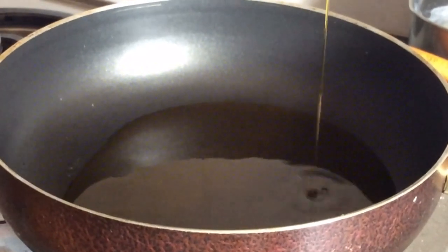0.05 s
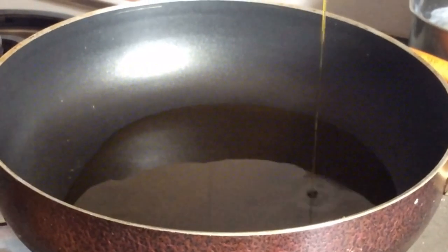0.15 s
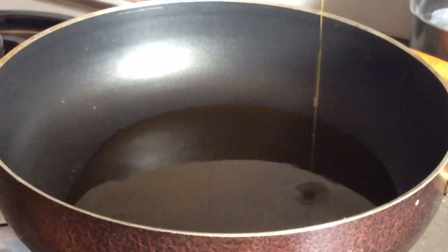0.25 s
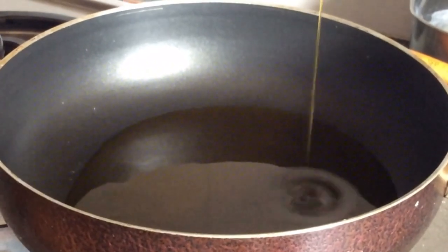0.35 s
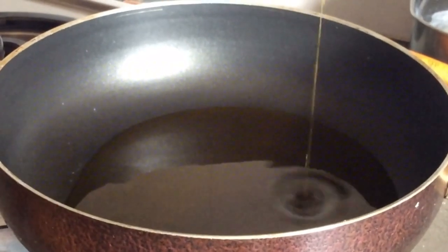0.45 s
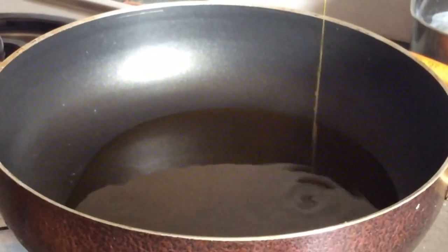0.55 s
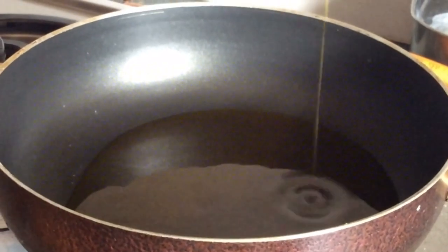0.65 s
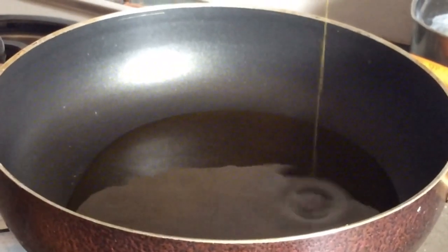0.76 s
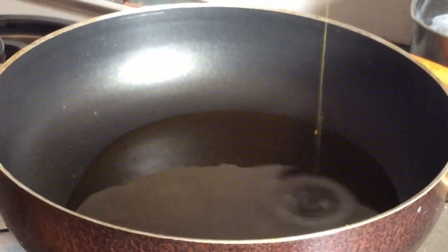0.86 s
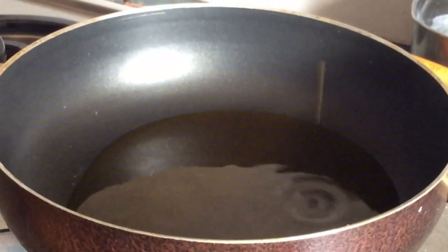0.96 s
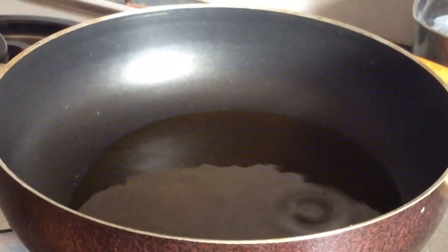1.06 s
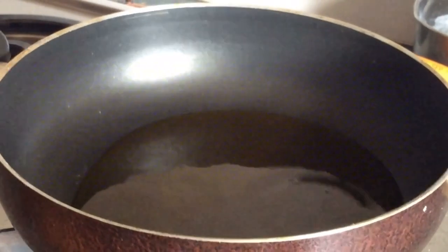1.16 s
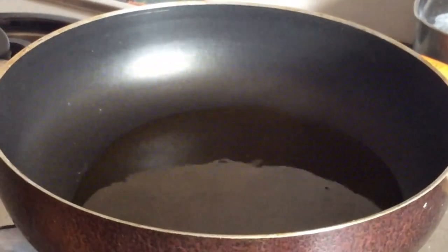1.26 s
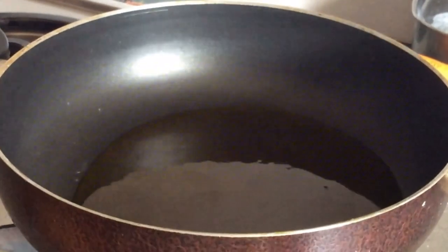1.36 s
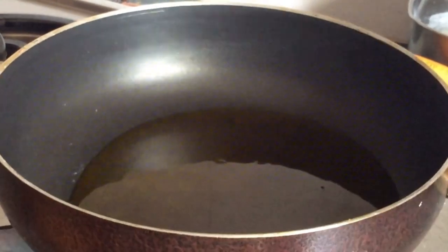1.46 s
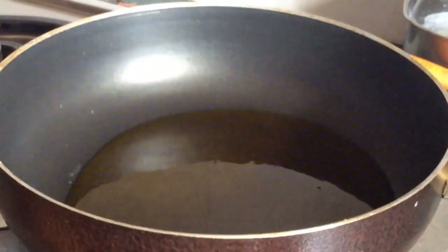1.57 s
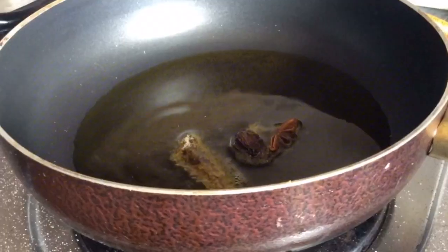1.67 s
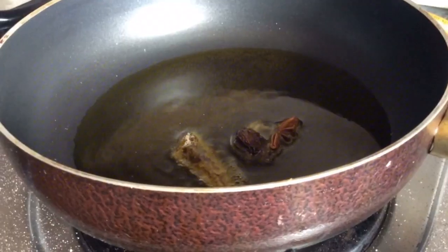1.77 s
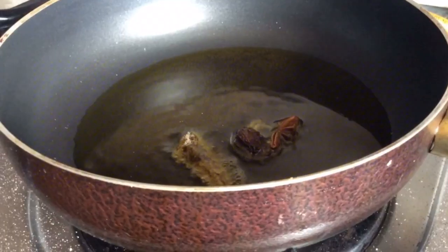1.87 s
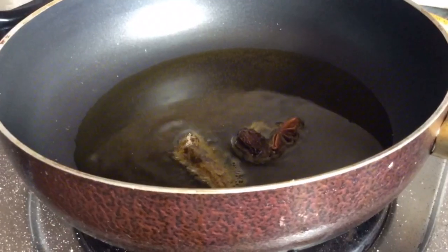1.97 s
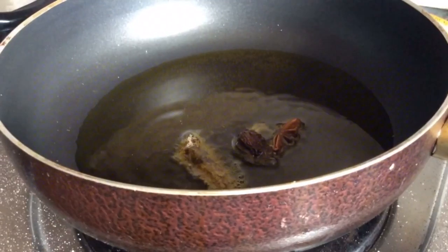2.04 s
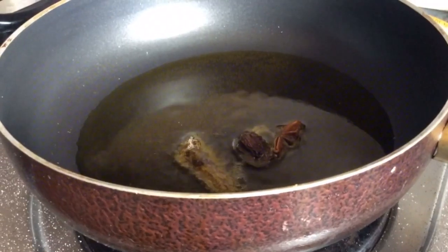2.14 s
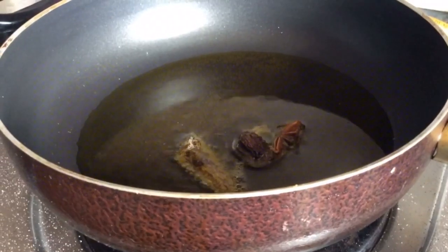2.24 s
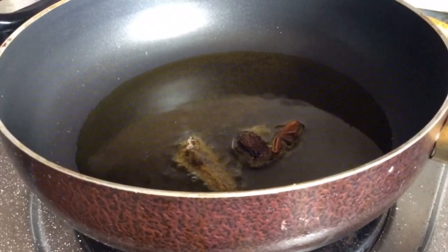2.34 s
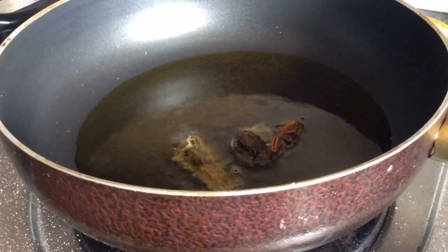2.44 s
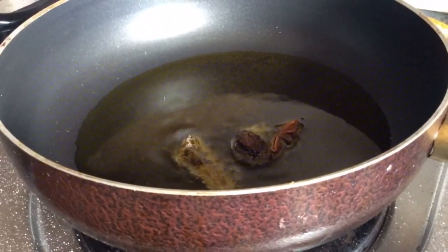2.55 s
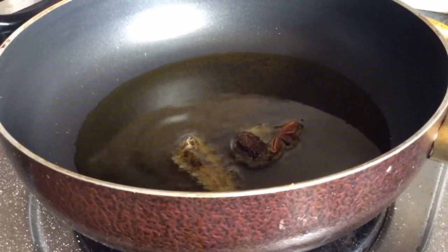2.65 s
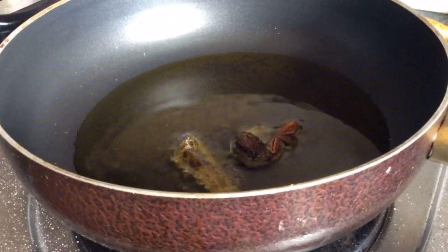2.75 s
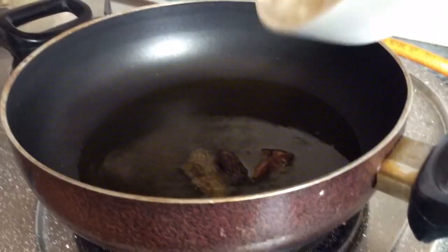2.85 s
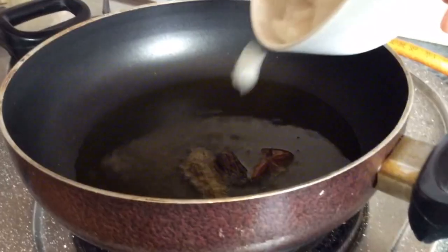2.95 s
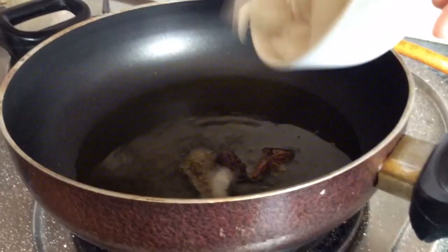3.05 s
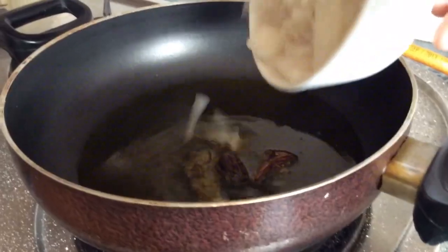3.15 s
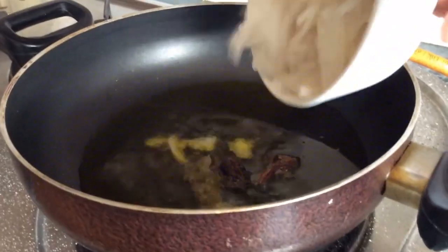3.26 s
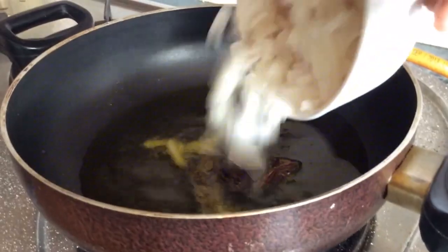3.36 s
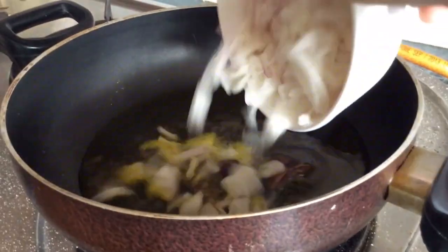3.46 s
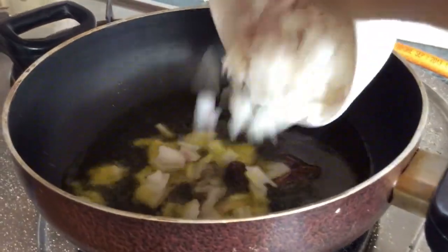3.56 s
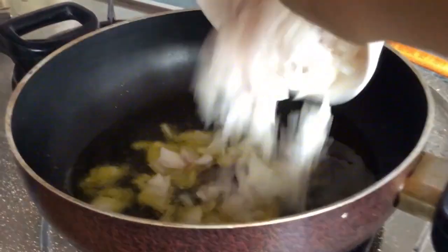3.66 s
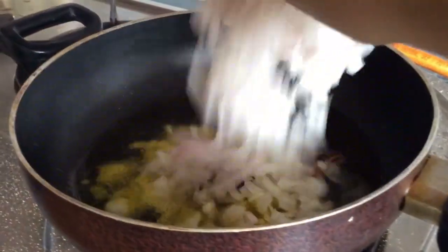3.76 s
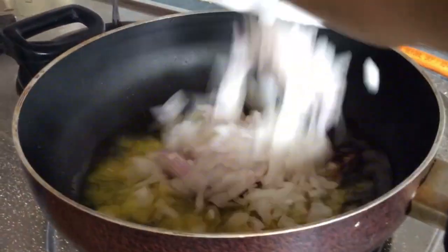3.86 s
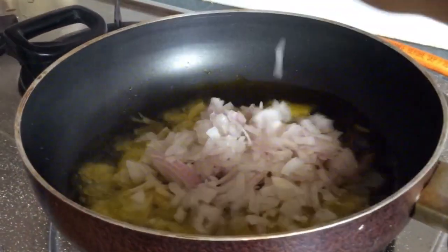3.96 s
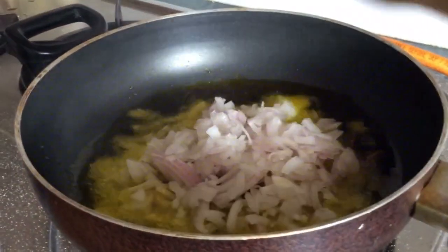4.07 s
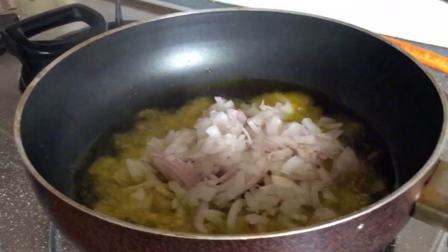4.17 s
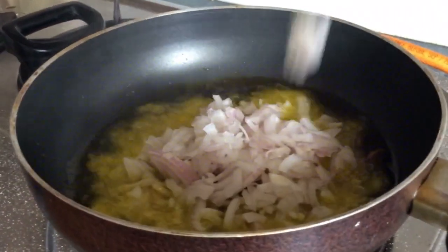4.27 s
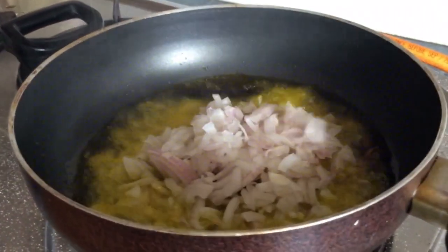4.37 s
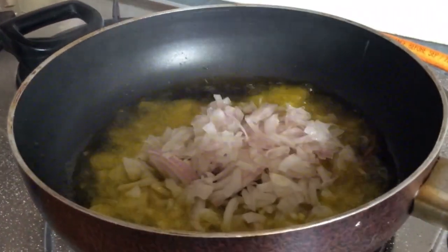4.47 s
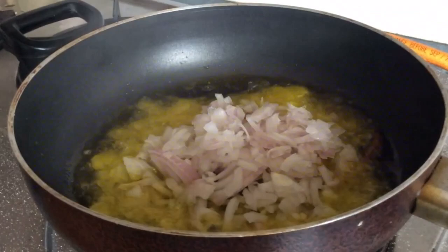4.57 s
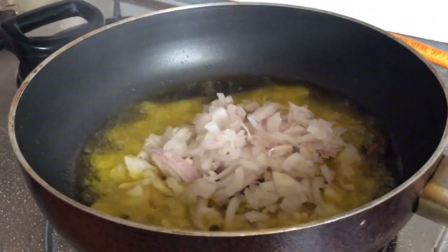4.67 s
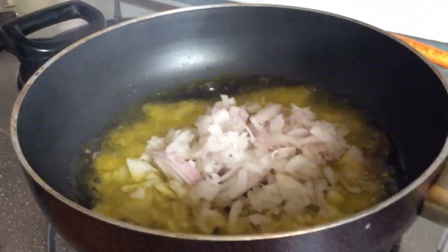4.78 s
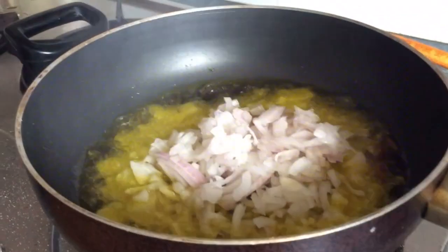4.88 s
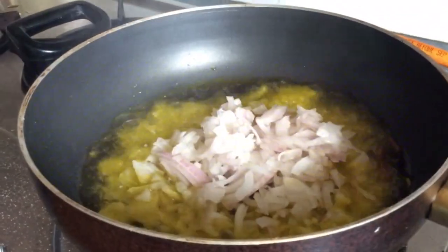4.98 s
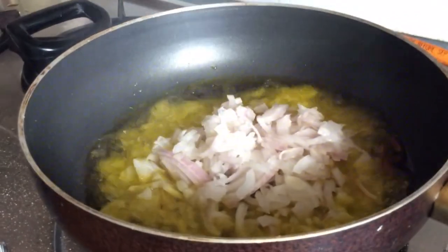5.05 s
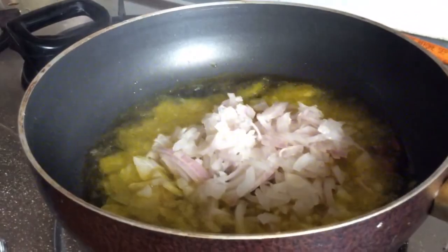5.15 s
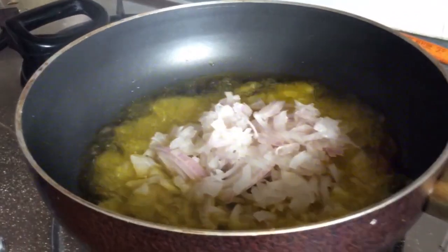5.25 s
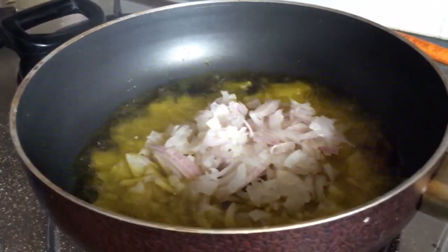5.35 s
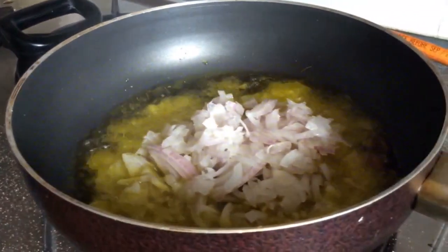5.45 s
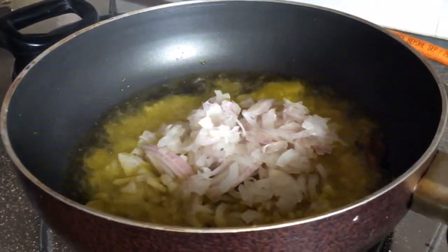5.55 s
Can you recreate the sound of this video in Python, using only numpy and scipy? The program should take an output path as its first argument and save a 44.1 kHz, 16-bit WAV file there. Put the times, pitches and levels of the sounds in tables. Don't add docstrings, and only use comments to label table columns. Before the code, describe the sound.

Close microphone over a pan in a small, slightly reverberant kitchen. Over three seconds of near quiet hold low rumble, faint drips, isolated knocks, distant crow calls and a barely audible fine fizz. Chopped onions then land in bursts, flashing into dense bright sizzle and hard crackles, loudest around four seconds, before easing to steady frying with larger popping bubbles.

```python
import sys
import numpy as np
from scipy import signal
from scipy.fft import rfft, irfft
from scipy.io import wavfile
from scipy.ndimage import uniform_filter1d

SR = 44100
rng = np.random.default_rng(int(sys.argv[2]) if len(sys.argv) > 2 else 0)


def digitize_waveform(pressure):
    field = np.atleast_2d(pressure).T
    bounded = np.clip(field, -1, 1)
    quanta = np.round(bounded * 32767).astype(np.int16)
    wavfile.write(sys.argv[1], SR, quanta)


def voltage_ratio(decibels):
    exponent = np.asarray(decibels, float) / 20
    return 10 ** exponent


N = 247522
TIME = np.arange(N) / SR
BINS = np.fft.rfftfreq(N, 1 / SR)


# (time [s], level [dB])
STEAM = [
    (3.258, -55),
    (3.284, -42.5),
    (3.43, -43.5),
    (3.6, -33),
    (3.75, -30),
    (4.104, -24),
    (4.322, -26.5),
    (4.996, -32.5),
    (5.61, -34),
]
# (time [s], extra level [dB], spread [s])
LANDINGS = [
    (3.29, -1.5, 0.024),
    (3.39, 3, 0.018),
    (3.475, 3, 0.015),
    (3.56, 3, 0.039),
    (3.69, 1, 0.056),
]


def steam():
    surges = sum(db * np.exp(-((TIME - s) / spread) ** 2) for s, db, spread in LANDINGS)
    return np.interp(TIME, *np.transpose(STEAM)) + surges


# (frequency [Hz], density [dB/Hz])
FRY_COLOUR = [(150, -60), (250, -38), (399, -24.5), (554, -19), (693, -16.5), (824, -11), (980, -13.5),
              (1340, -9), (1890, -8), (2900, -5.5), (3310, -1), (3800, -3), (7040, 1), (8220, 5.5),
              (9440, 3.5), (12500, -7.5), (15600, -20)]


def frying():
    heap_s, heap_spread_s = 3.83, 0.23
    spray_open_db, spray_covered_db = 3, -2.56
    big_db, big_db_per_s, steam_mid_db = -38.5, 2.5, -28
    mid_db = steam()
    covered = .5 + .5 * np.tanh((TIME - heap_s) / heap_spread_s)
    high_db = mid_db + spray_open_db + (spray_covered_db - spray_open_db) * covered
    low_db = big_db + (mid_db - steam_mid_db) + big_db_per_s * (TIME - STEAM[5][0])
    dense = evened(bubbling(per_s=7000, spread_db=3.0, clump_db=1.1, wet_db=-8))
    crackle = evened(bubbling(per_s=420, spread_db=2.0, clump_db=1.5, wet_db=-12))
    fizz = patchy(coloured(dense + voltage_ratio(-7.0) * crackle, FRY_COLOUR))
    low, below = lowpassed(fizz, 2370), lowpassed(fizz, 6470)
    big = voltage_ratio(low_db) * evened(low)
    middling = voltage_ratio(mid_db) * evened(below - low)
    fine = voltage_ratio(high_db) * evened(fizz - below)
    return (TIME >= STEAM[0][0]) * (big + middling + fine)


# (time [s], peak [dB], pitch [Hz])
TICKS = [(3.3219, -25.0, 9040.0), (3.3271, -20, 8350.0), (3.374, -29, 6760), (3.3918, -24.0, 9220.0),
         (3.3978, -22.0, 7670.0), (3.5777, -11, 8100.0), (3.5945, -19, 8530.0), (3.6155, -21, 8440.0),
         (3.6836, -8.5, 4390.0), (3.7056, -8, 7600), (3.7193, -15, 8600), (3.7295, -17, 9820.0),
         (3.7737, -12, 8000), (3.8033, -22, 4000), (3.8094, -13.0, 5860.0), (3.8786, -11.0, 7670.0),
         (3.8917, -11.5, 4220.0), (3.9044, -8, 9100), (3.9286, -19, 8200), (3.9483, -10.0, 6630.0),
         (4.0364, -16, 7840.0), (4.0681, -3, 9130.0), (4.0836, -7.0, 5600.0), (4.0984, -8, 5340.0),
         (4.1574, -6, 8530.0), (4.1803, -21, 5500),
         (4.2576, -15, 3880.0), (4.267, -13, 3620.0), (4.3019, -18, 6890.0), (4.3319, -18, 7400),
              (4.3471, -15, 4130.0), (4.3553, -14, 8240), (4.4296, -20, 9300.0), (4.445, -15, 9000),
              (4.4716, -14, 10420.0), (4.5038, -16, 8300), (4.5092, -4, 3600), (4.5533, -20, 8010.0),
              (4.601, -12, 6460.0), (4.644, -18, 9400), (4.6494, -16, 4570.0), (4.682, -15.0, 9220.0),
              (4.7191, -14.0, 7840.0), (4.7648, -13, 5170.0), (4.7894, -16, 7320.0), (4.8398, -14.5, 2400),
              (4.8992, -17, 2370), (4.9369, -17.5, 2740), (5.019, -19, 3190.0), (5.051, -15, 7840.0),
              (5.1122, -11, 5770.0), (5.18, -12, 5100), (5.2247, -16, 3530.0), (5.3106, -12.0, 8270.0),
              (5.3313, -16, 5860.0), (5.361, -16, 8440.0), (5.3712, -15, 4310.0), (5.403, -18, 7670.0),
              (5.435, -18.0, 3700.0), (5.493, -14, 8100.0), (5.574, -17, 5400), (5.5802, -9, 8350.0)]
# (time [s], peak [dB], pitch [Hz])
SPRAY = [(3.2107, -29, 5860), (3.256, -31, 8270), (3.2768, -25, 8100), (3.2832, -28, 9000),
         (3.2908, -21, 9600), (3.3369, -15, 8150), (3.3562, -20, 7850), (3.4776, -13, 9000),
         (3.5491, -10, 7600), (3.5601, -13, 8150), (3.5778, -11, 7860), (3.5818, -15, 7660),
         (3.6733, -10, 9200), (3.7738, -15, 7900), (3.8736, -7.5, 7800), (3.9335, -6.5, 7400),
         (3.9937, -2, 8650), (4.0653, -6, 8950), (4.3319, -8, 8100), (4.4827, -12, 9150),
         (4.5039, -18, 8480), (3.705, -15, 7960), (3.44, -19, 5940), (5.3107, -18, 8200),
         (5.3611, -18, 8440)]
# (time [s], peak [dB], pitch [Hz])
SNAPS = [(3.3981, -29, 7600), (3.6471, -29, 5200), (3.8834, -10, 5360), (3.9287, -6, 8160),
         (3.9671, -6, 4260), (4.0736, -1.5, 4600), (4.1522, -2, 3650), (4.1803, -16, 5540),
         (4.1983, -9, 8970), (4.221, -5, 9200), (4.2798, -14, 4940), (4.3485, -28, 1000),
         (4.5229, -10, 4200), (4.6071, -7, 4000), (4.6942, -9, 6000), (4.8197, -4.5, 8250),
         (5.1871, -11, 3240), (5.2094, -9, 3030), (5.2482, -12.5, 5640), (5.4031, -29, 5990),
         (5.5803, -11.5, 1510)]
# (time [s], peak [dB], pitch [Hz], snap share [0-1])
CRACKS = [(3.4066, -10, 5770, .75), (3.4867, -8, 8000, .55), (3.6606, -2, 8200, .65),
          (3.6802, -3, 8180, .3), (4.3175, -4, 6500, .6), (4.4474, -1, 7600, .45), (4.5091, -2, 4300, .7),
          (4.6191, 0, 7800, .6), (4.8285, -7, 6500, .65), (5.3375, -7, 6650, .4), (5.5862, -1, 2950, .8)]
# (time [s], peak [dB], pitch [Hz], ring [cycles])
BUBBLES = [(3.4634, -14.5, 4670, 2.7), (3.746, -10, 4400, 3.8), (3.829, -16, 3640, 9.7),
           (4.0585, -10, 3920, 4.2), (4.0837, -16, 5400, 2.9), (4.3716, -11, 3500, 5),
           (4.7555, -8, 3850, 2.1), (4.7628, -12, 2300, 1.4), (4.829, -28, 990, 2.6),
           (4.8509, -5.5, 3500, 3.4), (4.8601, -11.5, 4060, 6.5), (4.876, -7.5, 2930, 4.7),
           (4.9367, -19.5, 2820, 4.3), (4.9926, -9, 3720, 5.8), (5.1237, -7.5, 3220, 4.9),
           (5.1821, -5.5, 2720, 2.8), (5.1988, -6, 3500, 1.3), (5.276, -16.5, 3800, 3.7),
           (5.2765, -21, 1300, 1.2), (5.345, -12, 4950, 3.2), (5.3714, -14.5, 3400, 4.9),
           (5.4612, -9.5, 3320, 15), (5.5087, -16, 3340, 1), (5.586, -19, 890, 0.49),
           (5.225, -22.5, 1420, 1.3), (5.256, -25.5, 1000, 1.4), (5.501, -28.5, 1100, 1.3)]


def spits():
    ticks = pops(TICKS, cycles=2.1, snap=0.28, sputter_ms=0.56, wet_db=-5)
    spray = pops(SPRAY, cycles=2.9, snap=0.04, sputter_ms=2.0, wet_db=-6.5)
    snaps = pops(SNAPS, cycles=1.8, snap=0.67, sputter_ms=1.1, wet_db=-5)
    cracks = sum(pops([(s, db, hz)], cycles=3.7, snap=snap, sputter_ms=0.99, wet_db=None)
                 for s, db, hz, snap in CRACKS)
    bubbles = pops(BUBBLES, snap=.25, sputter_ms=1.7, wet_db=-16)
    return ticks + spray + snaps + room(cracks, wet_db=-12.5) + bubbles


# (middle [s], spread [ms], level [dB], pitch [Hz])
FLURRIES = [(3.277, 1.2, -25.5, 8200), (3.284, 2.4, -35, 9200), (3.291, 1.7, -26, 9200),
            (3.298, 1.7, -32, 8500), (3.326, 4, -33, 8400), (3.338, 1.5, -28, 8050),
            (3.358, 1.8, -28, 8100), (3.374, 3.1, -36, 7000), (3.447, 5, -33, 5600),
            (3.454, 2.1, -33, 2600), (3.468, 3.6, -31, 5000), (3.157, 3, -53, 5500),
            (3.212, 2, -42.5, 8300), (3.407, 0.91, -22, 10000), (4.319, 1.5, -22, 4500),
            (3.479, 2, -29, 9000), (3.488, 2.3, -22, 7500), (3.546, 6.8, -27, 8250), (3.568, 3, -25, 4700),
            (3.58, 2.5, -21, 7600), (3.647, 3.5, -23, 5370), (3.65, 3.2, -23, 8900),
            (3.674, 1.2, -31, 9200), (3.685, 2, -25, 4530), (3.713, 2.3, -37, 3320),
            (3.775, 1.7, -26, 4100), (3.826, 3.6, -26, 7700), (3.884, 4.7, -26, 3430), (5.02, 3, -30, 3630),
            (5.266, 2, -26.5, 5200), (5.29, 3.5, -34, 3120), (5.406, 2.3, -32, 3100), (4.551, 2, -36, 3250),
            (4.585, 1.7, -26, 4300), (4.395, 2.4, -31, 3600)]


def flurries():
    pitch_width_share, rise_share = 0.21, 0.58
    out, t = np.zeros(N), np.arange(-1000, 1000) / SR
    hz_axis = np.fft.rfftfreq(2000, 1 / SR)
    for s, spread_ms, db, hz in FLURRIES:
        swarm = rng.standard_normal(2000) * rng.exponential(1, 2000) ** 1.7
        resonance = 1 / (1 + ((hz_axis - hz) / (pitch_width_share * hz)) ** 2)
        swarm = evened(irfft(rfft(swarm) * resonance))
        spread_s = np.where(t < -spread_ms / 2000, rise_share, 1) * max(spread_ms, .5) / 1000
        out[round(s * SR) - 1000:][:2000] += voltage_ratio(db) * swarm * np.exp(-(t / spread_s) ** 2 / 2)
    return room(out, wet_db=-8)


# (start [s], end [s], level [dB], rise [dB/s])
SIMMER = [
    (1.693, 2.887, -63, 0.5),
    (2.889, 3.27, -59.5, 5.5),
]
# (frequency [Hz], density [dB/Hz])
SIMMER_COLOUR = [(2120, -23), (3600, -1.5), (4090, -6.5), (4590, -1.5), (4960, -6), (6280, -1), (6880, -5),
                 (8200, 1), (9540, -1), (13600, -17), (15300, -16)]


def simmer():
    fizz = bubbling(per_s=9000, spread_db=3.5, clump_db=.8, wet_db=0.1)
    fizz = evened(coloured(fizz, SIMMER_COLOUR))
    return sum(between(s, end) * voltage_ratio(db + db_per_s * (TIME - s)) * fizz
               for s, end, db, db_per_s in SIMMER)


# (start [s], length [s], pitch [Hz], level [dB], change [dB/s])
HOLLOWS = [(0, .35, 2050, -67, -15), (0.33, 0.15, 5250, -52, -170), (1.25, .12, 3330, -63, -100),
           (1.25, .08, 4500, -69, -120), (1.25, .08, 7100, -70, -120), (1.685, 0.11, 365, -59, -80),
           (2.887, 0.46, 754, -70.5, 3), (3.143, 0.044, 560, -57, -150), (3.145, 0.036, 1194, -58, -100),
           (3.14, .16, 930, -63, -20), (3.205, .07, 2500, -62, -30), (3.492, 0.15, 553, -53, 0),
           (3.675, .025, 530, -47, 0), (3.75, .3, 560, -55, 3)]


def hollow_notes():
    out = np.zeros(N)
    for s, length, hz, db, db_per_s in HOLLOWS:
        level = voltage_ratio(db + db_per_s * np.clip(TIME - s, 0, length))
        out += between(s, s + length) * level * whistle(hz, width_hz=35 + 0.1 * hz)
    return out


# (time [s], peak [dB], decay [ms])
KNOCKS = [
    (0.3258, -27.5, 4),
    (1.2476, -37.5, 5.1),
    (1.988, -24, 1.9),
]
# (frequency [Hz], density [dB/Hz])
KNOCK_COLOURS = [
    [(880, -54), (1500, -41), (2080, -11), (3400, -20), (4770, -6), (5350, 1), (9450, -20), (10800, -39),
     (11300, -67), (15000, -41)],
    [(880, -62), (1500, -39), (2150, -10), (2600, -22), (3350, 4), (3850, -18), (4350, -2), (5100, -22),
     (5700, -13), (6400, -20), (7050, -7), (7600, -18), (8600, -11), (9740, -18), (11300, -37),
     (13000, -97)],
    [(880, -57), (1500, -28), (3000, -11), (3680, -6), (4560, -1), (5350, -22), (6690, -3), (7350, -9),
     (8300, 1), (14000, -36)],
]


def knocks():
    out, t = np.zeros(N), np.arange(2048) / SR
    hz_axis = np.fft.rfftfreq(2048, 1 / SR)
    for (s, db, decay_ms), colour in zip(KNOCKS, KNOCK_COLOURS):
        rattle = irfft(voltage_ratio(read(colour, hz_axis)) * np.exp(2j * np.pi * rng.random(1025)))
        rattle = rattle * np.exp(-t / (decay_ms / 1000)) * (1 - np.exp(-t / .0001))
        out[round(s * SR):][:2048] += voltage_ratio(db) * rattle / abs(rattle).max()
    return room(out, wet_db=-13)


# (time [s], peak [dB], pitch [Hz])
CLICKS = [(.012, -49, 8160), (.0214, -49, 9340), (.0493, -44, 7240), (.0935, -40.5, 2630),
          (.0495, -50, 2670), (.1535, -56, 3100), (1.033, -57, 5600), (1.4726, -52, 8400), (1.5, -56, 5000),
          (2.545, -51, 4000), (.1451, -47, 2940), (.1514, -58, 7470), (.2369, -52, 6950),
          (.2523, -52, 4100), (.2808, -45.5, 4090), (.2907, -52, 2100), (.2912, -46, 3130),
          (.3014, -49, 9400), (.4469, -53, 11000), (.4733, -47.5, 8200), (.4844, -49, 4300),
          (.4795, -52, 3200), (.492, -51, 6000), (.0985, -43, 2360), (.104, -63, 3100), (.5801, -51, 3730),
          (.5944, -53, 5000), (1.0194, -62, 2140), (1.4726, -52.5, 4000), (1.4894, -58, 8320)]


def clicks():
    return pops(CLICKS, snap=.3, sputter_ms=3.7, wet_db=-6)


# (start [s], length [s], loudest partial [Hz], level [dB], rasp [dB], upper partials [dB])
CAWS = [
    (1.01, .43, 1965, -66, -9, 9),
    (2.44, .39, 2045, -61, -12, -8),
]
# (ratio to loudest [1], level [dB])
CAW_PARTIALS = [(.68, -6), (.82, -6), (.9, 0), (1.1, 0), (1.2, -5)]


def crow():
    out = np.zeros(N)
    for s, length, top_hz, db, rasp_db, upper_db in CAWS:
        done = np.clip((TIME - s) / length, 0, 1)
        hz = top_hz * (1 - .015 * (1 - done) ** 4 - .11 * done ** 2)
        effort = between(s, s + length) * voltage_ratio(db - 17 * (1 - np.sin(np.pi * done ** .65)))
        rasp = sum(voltage_ratio(d + upper_db * (k > 1)) * whistle(hz * k, width_hz=55) for k, d in CAW_PARTIALS)
        voice = 0.75 * tone(hz, wander_hz=40, rate_hz=90) + .5 * whistle(hz, width_hz=170)
        out += effort * (voice + voltage_ratio(rasp_db + 14 * (done - .5)) * rasp)
    return out


# (start [s], length [s], level [dB], low line [dB], top line [dB])
HORN = [
    (1.87, 0.041, -67, -16, 1),
    (1.91, .03, -69, 0, 10),
    (1.93, 0.085, -57.5, -13, 0),
    (2.029, 0.078, -60, -18, -12),
    (2.157, .06, -66, -10, -12),
    (2.25, 0.045, -67, -14, -10),
    (2.357, .03, -70, -15, -12),
]
# low, middle, top [Hz]
HORN_LINES = [2990, 3410, 3840]


def horn():
    edge_s = .02
    blips = sum(voltage_ratio(db + np.array([[low_db], [0], [top_db]])) * between(s, s + length)
                for s, length, db, low_db, top_db in HORN)
    blips = uniform_filter1d(blips, round(edge_s * SR))
    lines = [voltage_ratio(2.1 * drifting(rate_hz=26)) * tone(hz, wander_hz=13.8, rate_hz=46) for hz in HORN_LINES]
    return room((blips * lines).sum(0), wet_db=-12)


# (middle [s], length [s], level [dB])
HUM_SWELLS = [(0.354, 0.37, -59), (0.673, 0.42, -62), (1.09, 0.17, -55.5), (1.473, 0.34, -59),
              (1.877, 0.31, -53.5), (2.198, 0.32, -55.5), (2.592, 0.38, -54.5), (2.906, 0.2, -54.5),
              (3.083, 0.14, -54), (3.328, 0.23, -49.5), (3.608, 0.093, -55), (3.858, 0.76, -64),
              (4.26, 0.14, -52), (4.43, 0.13, -53), (4.73, 0.24, -50), (5.2, 0.5, -61), (5.514, 0.41, -57)]


def hum():
    hum_hz, sub_hz, rest_db, sub_db = 96, 48.2, -69.5, -60
    swell = voltage_ratio(rest_db) + sum(voltage_ratio(db) * np.cos(np.pi * np.clip((TIME - s) / length, -.5, .5))
                               for s, length, db in HUM_SWELLS)
    throb = tone(sub_hz, wander_hz=5.26, rate_hz=8.2) + 0.26 * whistle(sub_hz + 12, width_hz=33)
    sub = voltage_ratio(sub_db + 1.5 * drifting(rate_hz=0.73)) * throb
    return swell * tone(hum_hz, wander_hz=3.16, rate_hz=7.0) + sub


# (time [s], level [dB])
TRAFFIC = [
    (0, -57.5),
    (1.0, -54),
    (1.5, -56),
    (2.4, -59),
    (3.0, -59),
    (3.5, -58),
    (4.0, -60.5),
    (4.7, -55.5),
    (5.2, -56),
    (5.61, -55),
]
# (frequency [Hz], density [dB/Hz])
RUMBLE = [(18, -28), (30, 1), (146, 2.5), (215, -5), (237, -48), (266, -5), (305, -28), (387, -18),
          (455, -41), (497, -7.5), (600, -48), (780, -51), (1320, -120)]


def traffic():
    rumble = evened(coloured(rng.standard_normal(N), RUMBLE))
    return voltage_ratio(np.interp(TIME, *np.transpose(TRAFFIC))) * rumble


# (frequency [Hz], density [dB/Hz])
AIR = [(150, -42), (250, -2.5), (282, -18), (307, -2.5), (377, -2.5), (455, -5.5), (496, -5.5),
       (664, -12.5), (888, -14), (1340, -10), (1790, -14.5), (1950, -13.5), (4150, -21.5), (8970, -26.5),
       (15000, -44)]


def room_air():
    level_db, rustle_db, rustle_s = -62.5, 4, 0.11
    air = evened(coloured(rng.standard_normal(N), AIR))
    pipe = voltage_ratio(-75 + 2.6 * drifting(rate_hz=5)) * whistle(1320, width_hz=98)
    return voltage_ratio(level_db + rustle_db * np.exp(-TIME / rustle_s)) * air + pipe


def kitchen():
    duck_from_db, duck_share = -33.5, 0.38
    low = hum() + traffic()
    over_db = np.maximum(uniform_filter1d(steam(), size=6000) - duck_from_db, 0)
    return voltage_ratio(-duck_share * over_db) * (low - lowpassed(low, 40.2) + room_air())


def bubbling(per_s, spread_db, clump_db, wet_db):
    clumps = voltage_ratio(clump_db * evened(lowpassed(rng.standard_normal(N), 27.4)))
    out = np.zeros(N)
    for hz in np.geomspace(900, 12000, num=22):
        draw = rng.random((2, N))
        size_db = spread_db * np.minimum(-np.log(draw[1] + 1e-9), 4)
        train = (draw[0] < per_s / 22 / SR) * voltage_ratio(size_db)
        out += signal.oaconvolve(train, burst(hz, cycles=1.97, snap=0.66, glide=0.16))[:N]
    return room(out * clumps, wet_db)


# (frequency [Hz], gain [dB])
MIC_EDGE = [(200, -8), (1200, -1), (3000, 1.5), (9500, 4), (12000, 0.5), (15000, -7.5)]


def pops(rows, snap, sputter_ms, wet_db, cycles=4.4):
    grid = np.linspace(0, 1, 200)
    mic = signal.firwin2(101, grid, voltage_ratio(np.interp(grid * SR / 2, *np.transpose(MIC_EDGE))))
    fade = np.exp(-np.arange(400) / SR / (sputter_ms / 1000))
    out = np.zeros(N + 1200)
    for s, db, hz, *own in rows:
        draw = rng.random((400, 2))
        train = (draw[:, 0] < .05) * (2 * draw[:, 1] - 1) * fade
        train[0] = 1
        ring_cycles = max(own[0] if own else cycles, .7)
        sound = np.convolve(train, burst(hz, ring_cycles, snap, glide=0.0023))
        sound = np.convolve(sound, mic)
        out[round(s * SR) - len(mic) // 2:][:len(sound)] += voltage_ratio(db) * sound / abs(sound).max()
    return out[:N] if wet_db is None else room(out[:N], wet_db)


def burst(hz, cycles, snap, glide):
    t = np.arange(400) / SR
    turns = hz * t * (1 + glide * hz * t / cycles)
    ring = np.sin(2 * np.pi * turns) * np.exp(-2.3 * hz * t / cycles) * (1 - np.exp(-3 * hz * t))
    crack = (1 - t / .00006) * np.exp(-t / .00006)
    mix = (1 - snap) * ring / abs(ring).max() - snap * crack
    return mix / abs(mix).max()


# (frequency [Hz], t60 [s])
ROOM = [(300, 0.08), (2000, 0.36), (5000, 0.16), (9000, 0.3), (14000, 0.081)]


def room(x, wet_db):
    hz, t, z = signal.stft(rng.standard_normal(SR // 2), SR, nperseg=128)
    decay = voltage_ratio(-60 * t / np.maximum(read(ROOM, hz), .02)[:, None])
    tail = signal.istft(z * decay, SR, nperseg=128)[1]
    tail = np.pad(tail / np.linalg.norm(tail), (90, 0))
    return x + voltage_ratio(wet_db) * signal.oaconvolve(x, tail)[:N]


def chance_field(shape, bins, frames):
    field = uniform_filter1d(rng.standard_normal(shape), size=bins, axis=0)
    return uniform_filter1d(field, size=frames, axis=1)


def patchy(x):
    hz, t, z = signal.stft(x, SR, nperseg=512)
    field = evened(chance_field(z.shape, bins=5, frames=4))
    return signal.istft(z * voltage_ratio(1.8 * field), SR, nperseg=512)[1][:N]


def holes(x, above_hz, share):
    hz, t, z = signal.stft(x, SR, nperseg=1024)
    field = chance_field(z.shape, bins=9, frames=6)
    starved = (field < np.quantile(field, share)) & (hz[:, None] > above_hz)
    return signal.istft(z * ~starved, SR, nperseg=1024)[1][:N]


def tone(hz, wander_hz, rate_hz):
    drift = wander_hz * drifting(rate_hz)
    return np.sqrt(2) * np.sin(2 * np.pi * np.cumsum(hz + drift) / SR)


def whistle(hz, width_hz):
    r = np.exp(-np.pi * width_hz / SR)
    noise = [1, 1j] @ rng.standard_normal((2, N))
    slow = signal.lfilter([1], np.convolve([1, -r], [1, -r]), noise)
    carrier = np.exp(2j * np.pi * np.cumsum(hz * np.ones(N)) / SR)
    return evened((slow * carrier).real)


def coloured(x, colour):
    z = rfft(x)
    flat = z / np.sqrt(uniform_filter1d(abs(z) ** 2, size=151))
    return irfft(flat * voltage_ratio(read(colour, BINS)), N)


def read(points, hz):
    f, value = np.transpose(points)
    return np.interp(np.log(hz + 1), np.log(f + 1), value)


def lowpassed(x, hz, order=8):
    return irfft(rfft(x) / (1 + (BINS / hz) ** order), N)


def drifting(rate_hz):
    return evened(lowpassed(rng.standard_normal(N), rate_hz))


def evened(x):
    return x / np.sqrt(np.mean(x ** 2) + 1e-20)


def between(start, end):
    return (TIME >= start) & (TIME <= end)


def scene():
    pan = frying() + spits() + flurries() + simmer()
    handling = hollow_notes() + knocks() + clicks()
    return (pan + handling + crow() + horn() + kitchen())[None]


def top_cut(x):
    return signal.sosfilt(signal.butter(12, 15400, fs=SR, output="sos"), x)


def record(dry):
    limited = lowpassed(np.clip(dry[0], -.98, .98), 15550, order=260)
    mix = holes(limited, above_hz=12900, share=.45)[None]
    return top_cut(mix)


dry = scene()
out = record(dry)
digitize_waveform(out)
```